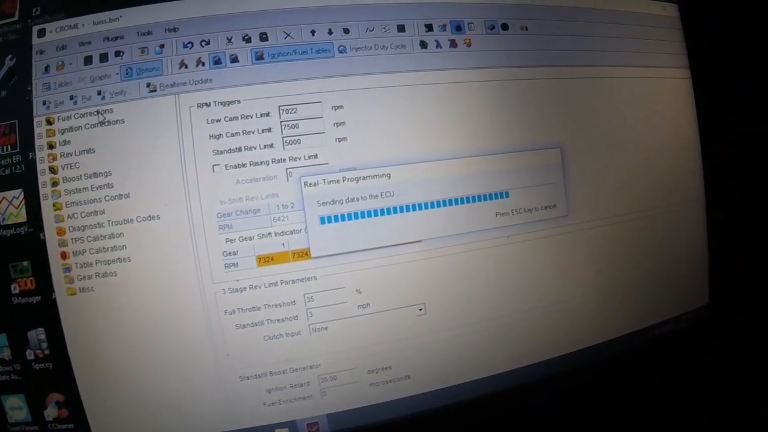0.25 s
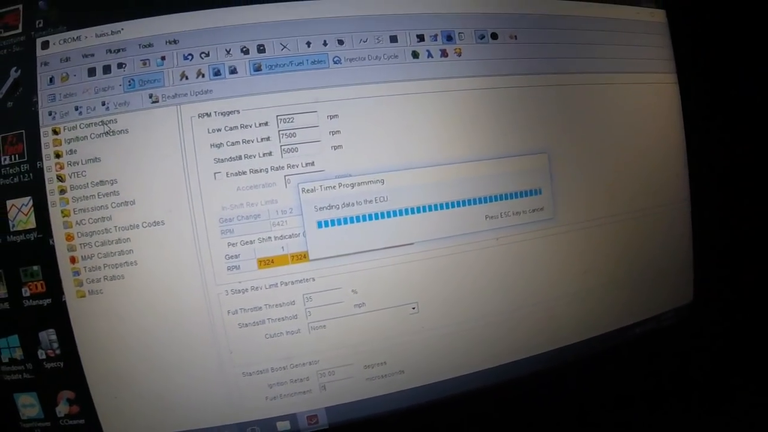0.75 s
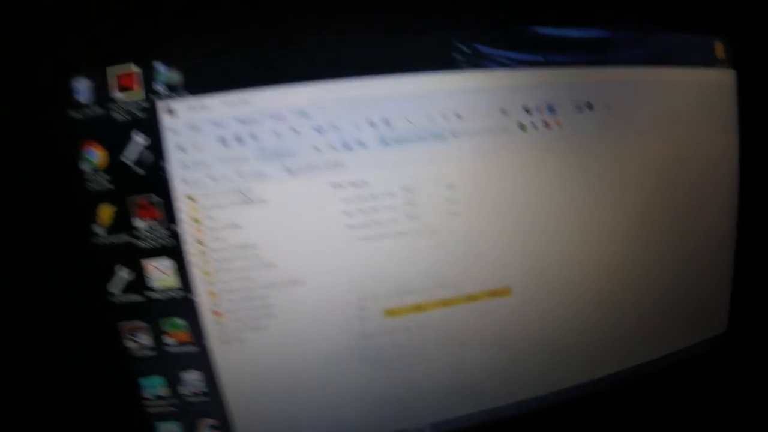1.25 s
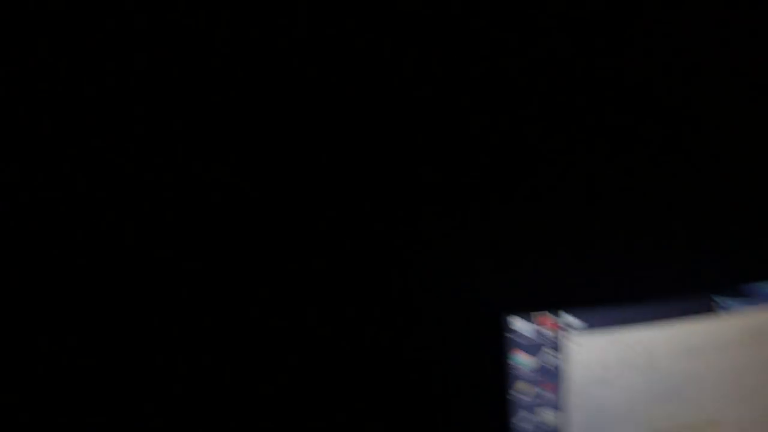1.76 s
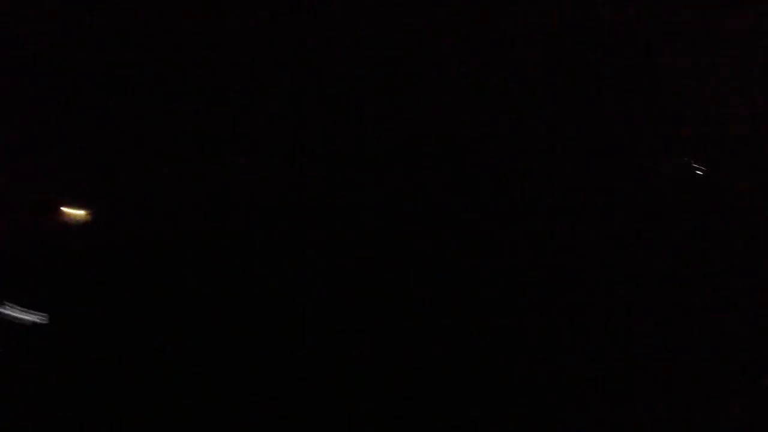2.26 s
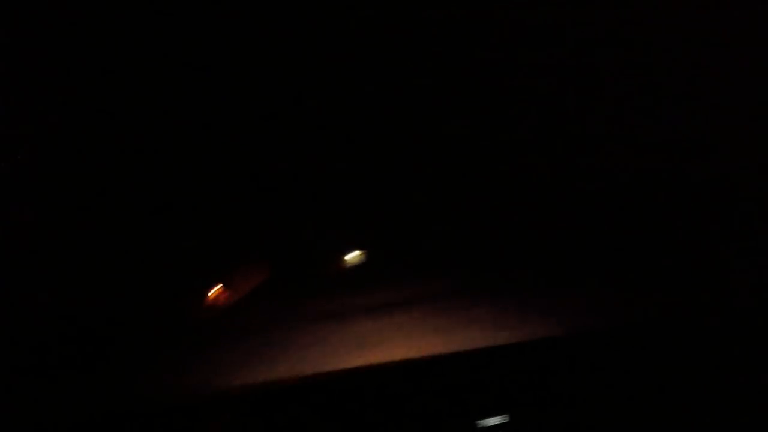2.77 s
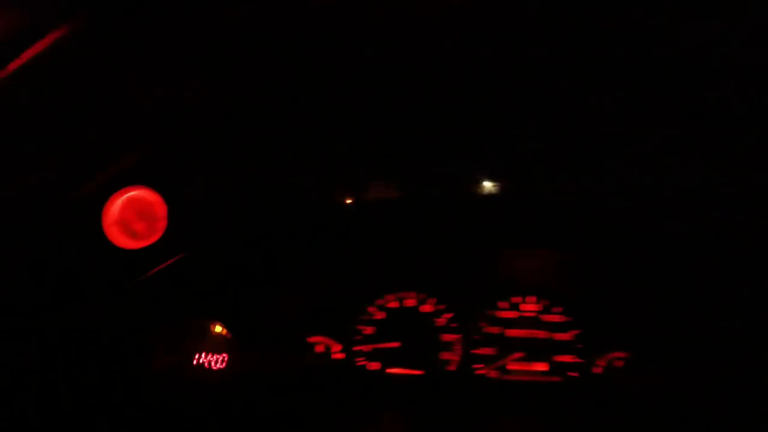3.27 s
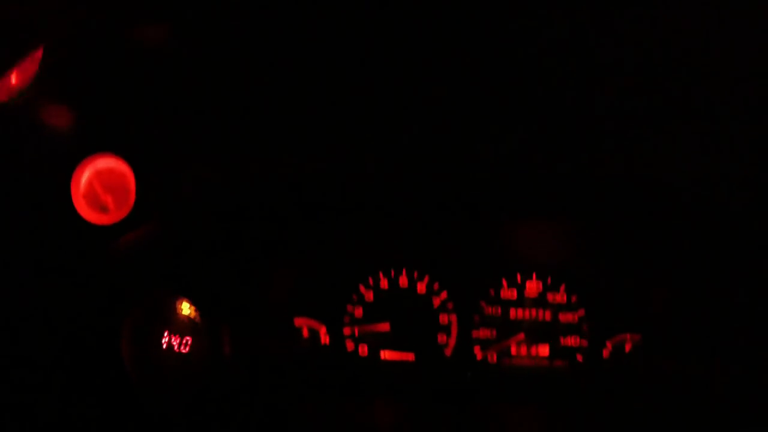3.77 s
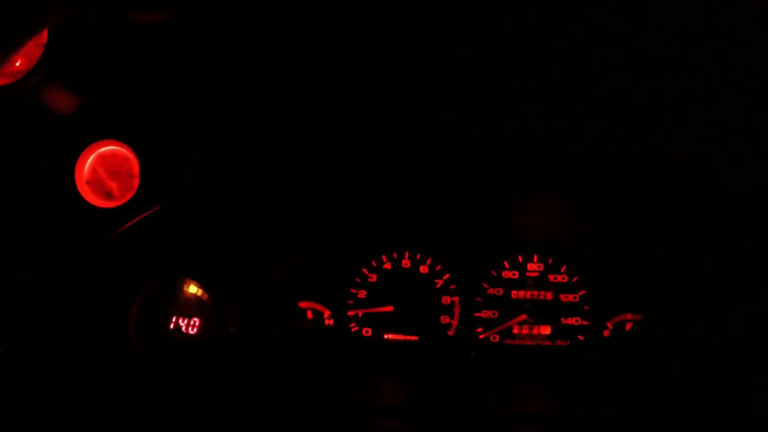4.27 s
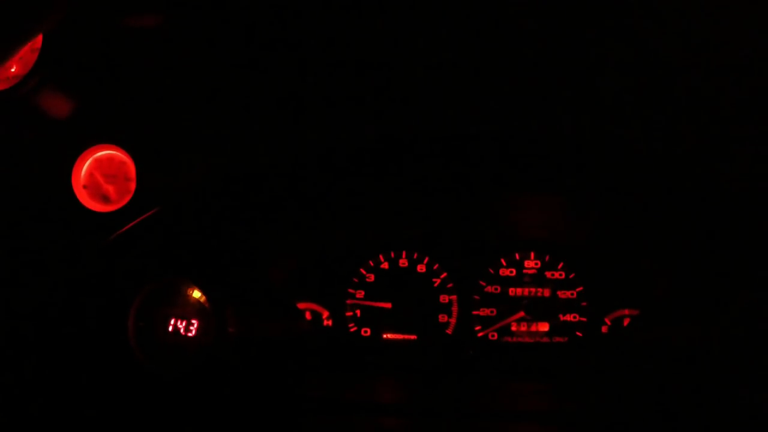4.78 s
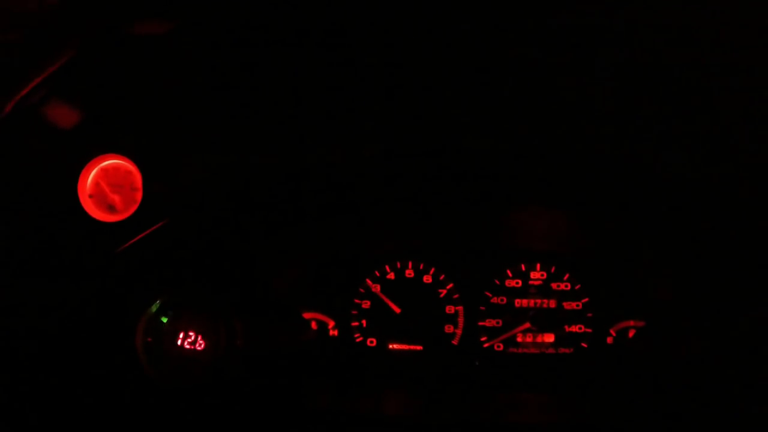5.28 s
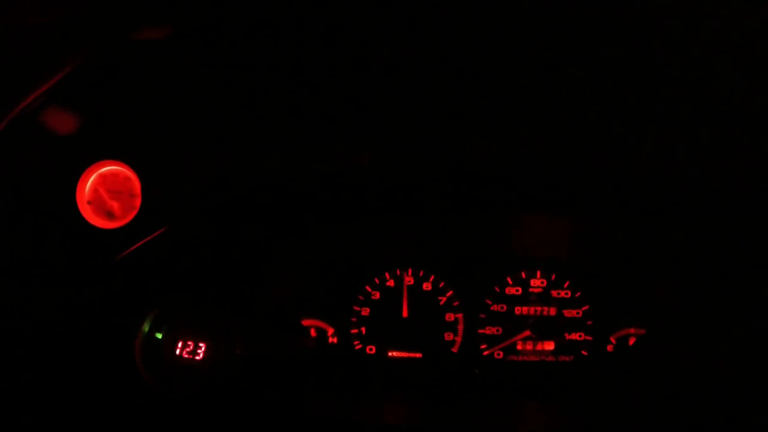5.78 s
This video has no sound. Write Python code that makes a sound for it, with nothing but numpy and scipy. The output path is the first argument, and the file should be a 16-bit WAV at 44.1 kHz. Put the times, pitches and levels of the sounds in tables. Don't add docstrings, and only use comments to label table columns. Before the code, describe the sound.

Heard inside a parked car, close and dry with a boomy cabin. From 0 s a four-cylinder engine idles steadily, a low hum of about 35 firings per second with cabin boom around 140-200 Hz, soft pipe roar and light valve clatter. From 1.5 s the microphone swings toward the driver's side; cloth brushes faintly, the boom dips and a dashboard hum stands out near 2 s. A plastic creak with hollow knocks comes at 2.15-2.2 s, a softer knock at 2.4 s and another at 4.0 s. Small clicks precede the throttle at 4.46 s: a deep thump and stumble around 4.5-4.6 s, then revs leap, hold briefly near 5.2 s and pull again from 5.35 s, loud and bassy with a very faint thin whistle. At 5.75 s the limiter chops the roar into uneven bursts and dull, raspy pops until it cuts off just after 6 s.

```python
import sys
import numpy as np
from scipy import signal
from scipy.fft import rfft, irfft
from scipy.io import wavfile
from scipy.ndimage import uniform_filter1d, minimum_filter1d

SR = 44100
rng = np.random.default_rng(int(sys.argv[2]) if len(sys.argv) > 2 else 0)


def digitize_waveform(pressure):
    field = np.atleast_2d(pressure).T
    bounded = np.clip(field, -1, 1)
    quanta = np.round(bounded * 32767).astype(np.int16)
    wavfile.write(sys.argv[1], SR, quanta)


def amplitude_ratio(level_db):
    exponent = np.asarray(level_db, float) / 20
    return 10 ** exponent


N = 266115

# start in seconds, end in seconds, level in dB against full load.
FIRING_BURSTS = [
    (5.8, 5.872, -4),
    (5.957, 5.98, -8),
    (5.98, 6.2, -6),
]
# time in seconds, peak in dB, pitch in Hz, push +1 or pull -1, rasp from 0 to 1.
PIPE_POPS = [(4.52, -7.5, 95, -1, 0.03), (4.55, 0, 105, -1, 0.03), (4.575, -4, 124, -1, 0.05),
             (4.599, -10, 131, -1, 0.1), (5.301, -10, 140, 1, 0), (5.754, -14, 72.2, 1, 0.3),
             (5.78, -1, 177, -1, 0.35), (5.793, -11.5, 101.3, 1, 0.8), (5.805, -20.5, 114, -1, 0.6),
             (5.876, -16.5, 61.1, 1, 0.4), (5.899, -3.5, 176, -1, 0.34), (5.910, -10, 85, 1, 0.8),
             (5.927, -4, 112, 1, 0.3), (5.935, -13, 110, 1, 0), (5.986, -1, 95.8, -1, 0.2),
             (5.997, -10, 115, 1, 0.6), (6.006, -4.5, 85.7, -1, 0.3)]
# pitch in Hz, width in Hz, level in dB.
CABIN_MODES = [(138, 24, -2), (179.5, 14.4, 2.5), (205.4, 20.6, -8.5)]
# frequency in Hz, level in dB.
PIPE_SPECTRUM = [(250, -10.5), (310, -8.5), (380, -6), (450, -18), (520, -13.5), (650, -17), (800, -17.5),
                 (1100, -26.5), (3200, -64.5)]
# frequency in Hz, level in dB per Hz.
RUMBLE_SPECTRUM = [(12, -13.5), (25, -6), (50, -1), (100, -0.5), (170, 5), (230, -6), (280, -21.5),
                   (450, -24.5)]
# frequency in Hz, level in dB per Hz.
ROAR_SPECTRUM = [(150, -29.5), (260, 7), (269, -3), (447, -9), (534, -7.5), (561, -7), (1160, -11),
                 (1800, -25.5), (2340, -38), (3960, -120)]
# frequency in Hz, level in dB per Hz.
CLATTER_SPECTRUM = [(880, -27.5), (1500, -3), (1620, -6), (2150, -4.5), (2450, -8), (3890, -15),
                    (5240, -15.5), (5910, -20), (6600, -18), (7520, -22.5), (10200, -34.5), (12500, -38.5),
                    (13700, -42)]
# pitch in Hz, width in Hz, level in dB.
VALVE_COVER = (6500, 71, -16)
# time in seconds, pitch in Hz, level in dB.
TURBO_WHISTLE = [(5.47, 3080, -73), (5.57, 3550, -71.5), (5.61, 3700, -62), (5.74, 3840, -61),
                 (5.8, 3820, -61), (5.87, 3880, -62), (6.04, 3780, -59)]
# pitch in Hz, width in Hz, level in dB.
TRIM_MODES = [(284.7, 9, 4.5), (484, 25, 2.5), (676, 40, 1), (1007, 26, -2.5), (1324, 71, -12),
              (1810, 63, -16.5), (2035, 69, -17.5), (3210, 450, -24), (4580, 230, -27.5),
              (6740, 230, -25.5)]
# time in seconds, peak in dB, extra level of the low hollow mode in dB.
TRIM_KNOCKS = [(2.156, -16, 9), (2.203, -14.5, 2), (2.367, -22, -2), (4.03, -19, -12), (4.52, -32.5, -11),
               (5.444, -24, -12.5), (5.777, -17, -12), (5.905, -23.5, -10)]
# time in seconds, peak in dB, pitch in Hz.
TRIM_CLICKS = [(2.123, -40.5, 3000), (2.4, -43, 6600), (4.449, -35, 4000), (4.490, -39.5, 3960),
               (4.617, -46.5, 5000), (5.609, -31, 2484)]
# pitch in Hz, width in Hz, level in dB.
BUZZING_PANELS = [(517, 16, -3.5), (660, 120, -9), (956, 56, -15), (1179, 64, -7), (1308, 23, -11.5),
                  (1630, 18, -13.5), (2190, 140, -15.5)]
# time in seconds, extra path in firing cycles.
EXTRA_PATH = [(1.6, .065), (2.7, 0)]
# multiple of the firing rate, level in dB.
UPPER_ORDER_LEVELS = [(2.5, -0.5), (3.5, 3.5), (4, 5), (4.5, -8), (5, 4.5), (6, -8.5), (7, 1.5), (8, -3.5),
                      (9, 0), (10, -6.5), (11, -6.5), (12, -1), (14, -2), (15, -2.5), (18, 3.5)]
# multiple of the firing rate, level in dB when slow,
# level in dB when fast.
UNEVEN_CYLINDERS = [(.25, -32.5, -31), (.5, -30, -35.5), (.75, -27, -20), (1.5, -19, -26),
                    (1.75, -32, -29.5)]
# time in seconds, level in dB, decay in seconds.
SUDDEN_STEP = (4.4582, -11, .003)
# time in seconds, firings per second.
ENGINE_SPEED = [(0.0, 34.39), (0.55, 34.86), (1.6, 34.69), (2.05, 34.31), (2.6, 35.11), (3.4, 35.11),
                (3.9, 34.71), (4.55, 35.34), (4.79, 61.69), (4.94, 71.91), (5.1, 96.29), (5.16, 100.51),
                (5.32, 102.15), (5.45, 123.91), (5.52, 143.35), (5.6, 160.05), (5.76, 167.04)]
# time in seconds, share of the way.
MIC_SWING = [(1.5, 0.027), (1.9, 0.39), (2.0, 0.44), (2.27, 0.6), (2.45, .66), (3.0, 0.72), (3.8, 1)]
# time in seconds, level in dB.
ENGINE_EFFORT = [(4.46, 3), (4.5, -13), (4.595, -10), (4.64, -4), (5.05, -2.5), (5.32, -1.5), (5.46, 5.5),
                 (5.54, -1), (5.62, 1)]
# idle level on the passenger side in dB, idle level on the driver's side in dB,
# loaded level at 100 firings per second in dB, slope in dB per octave of speed, share of the effort.
LOW_ORDER_LAWS = [
    (-19.5, -18.5, 1.3, -2.2, 1),
    (-24, -22.5, -2.5, 1.5, 0.48),
    (-30.5, -22.5, -9.5, -2, 0.72),
]
BOOM_LAW = (-21, -22, -36, 2.3, 4)
UPPER_LAW = (-43, -51, -40.5, 9.5, 0.05)
ROAR_LAW = (-46, -42.5, -45.5, 7.5, 0.07)
VALVE_LAW = (-53.5, -53, -55.5, 5.5, 0.3)
DASH_LAW = (-40.5, -45.5, -71, -1, -0.5)
TOP_LAW = (2.6, 0.5, -14, 3, -1.8)
LOW_MODE_LAW = (-4.5, 1.4, 2.5, -0.3, .1)
# pitch in Hz, width in Hz, level in dB.
FLOOR_PAN = [(52.6, 24, -17.5), (77, 15, -18.5), (99.7, 21, -19.5), (127, 25, -16), (167.5, 25.5, -10.5),
             (221, 20, -21), (256, 13, -28.5), (340.5, 29, -29), (383.5, 33, -21.5), (500, 49, -25.5)]
# peak time in seconds, level in dB.
TRIM_RUBS = [(2.16, -27.5), (2.194, -27), (2.207, -23)]
# middle in seconds, length in seconds, level in dB, pitch in Hz.
BRUSHES = [(1.68, .5, -54, 1700), (2.66, .05, -56.5, 4460), (2.78, .02, -56.5, 5400),
           (4.65, .055, -44, 270), (5.89, .13, -33, 370), (4.57, 0.078, -50.5, 930),
           (4.58, .06, -59.5, 3210)]

NODE_AT, NODE_WIDTH = 0.506, 0.14
NODE_BOOM_DB, NODE_HUM_DB = -14.5, 6
THROTTLE_S, LIMITER_S, OPENING_S = 4.46, 5.755, 0.02
RUMBLE_DB, LIMITER_RUMBLE_DB = -31.5, -23.5
LIMITER_ROAR_DB = 1
RUB_RISE_DB_S, RUB_FALL_DB_S = 1500, 701


def rms_one(x):
    return x / np.sqrt(np.mean(x ** 2) + 1e-20)


def in_time(rows):
    s, *columns = np.transpose(rows)
    return [np.interp(np.arange(N) / SR, s, c) for c in columns]


def at_hz(points, hz):
    point_hz, point_db = np.transpose(points)
    return np.interp(np.log(hz), np.log(point_hz), point_db)


def drift(rate):
    r = np.exp(-80 * np.pi * rate / SR)
    noise = rng.standard_normal(N // 40 + 2002)
    slow = signal.lfilter([1], [1, -2 * r, r * r], noise)[2000:]
    return np.interp(np.arange(N) / 40, np.arange(len(slow)), rms_one(slow))


def resonate(x, hz, width_hz):
    r = np.exp(-np.pi * width_hz / SR)
    poles = [1, -2 * r * np.cos(2 * np.pi * hz / SR), r * r]
    return signal.lfilter(np.array([1, 0, -1]) * (1 - r * r) / 2, poles, x + 1e-18)


def body(x, modes):
    return sum((-1) ** k * amplitude_ratio(db) * resonate(x, hz, width) for k, (hz, width, db) in enumerate(modes))


def coloured(spectrum, patchy_db):
    hz = np.maximum(np.fft.rfftfreq(N, 1 / SR), 1)
    shaped = rfft(rng.standard_normal(N)) * amplitude_ratio(at_hz(spectrum, hz))
    out = 0
    for centre in np.arange(np.log2(spectrum[0][0]), np.log2(spectrum[-1][0]) + 0.5, 0.5):
        share = np.clip(1 - 2 * abs(np.log2(hz) - centre), 0, 1)
        out = out + irfft(shaped * share, N) * amplitude_ratio(patchy_db * drift(14))
    return rms_one(out)


def struck(events):
    clicks = np.zeros(N)
    clicks[[round(e[0] * SR) for e in events]] = amplitude_ratio([e[1] for e in events])
    return clicks


def layer_db(law, rate_hz, response_db=0):
    near_db, far_db, loaded_db, octave_db, share = law
    swing, effort_db = np.clip(in_time(MIC_SWING)[0], 0, 1), in_time(ENGINE_EFFORT)[0]
    opened = np.clip((np.arange(N) / SR - THROTTLE_S) / OPENING_S + 0.5, 0, 1)
    idle = near_db + (far_db - near_db) * swing
    loaded = loaded_db + octave_db * np.log2(rate_hz / 100) + share * effort_db + response_db
    return idle + opened * (loaded - idle)


def node(db):
    return db * np.exp(-((in_time(MIC_SWING)[0] - NODE_AT) / NODE_WIDTH) ** 2)


def rustles():
    t = np.arange(N) / SR
    grains = rng.standard_normal(N) * amplitude_ratio(2.2 * drift(60))
    out = np.zeros(N)
    for s, length, db, hz in BRUSHES:
        band = resonate(resonate(grains, hz, 0.9 * hz), hz, 0.9 * hz)
        out += amplitude_ratio(db) * np.exp(-((t - s) / length) ** 2) * rms_one(band)
    return out


def trim():
    t = np.arange(N) / SR
    slopes = [db - np.maximum(RUB_RISE_DB_S * (s - t), RUB_FALL_DB_S * (t - s)) for s, db in TRIM_RUBS]
    level_db = np.max(slopes, axis=0)
    slips = (rng.random(N) < 1500 / SR) * rng.standard_normal(N)
    out = body(amplitude_ratio(level_db + 36) * slips, TRIM_MODES)
    out += amplitude_ratio(32) * body(struck(TRIM_KNOCKS), TRIM_MODES[1:7])
    hollow = [(s, db + low_db) for s, db, low_db in TRIM_KNOCKS]
    out += amplitude_ratio(34) * body(struck(hollow), TRIM_MODES[:1])
    for s, db, hz in TRIM_CLICKS:
        out += amplitude_ratio(15) * resonate(struck([(s, db)]), hz, 4600)
    step_decay = np.exp(-1 / (SUDDEN_STEP[2] * SR))
    out -= signal.lfilter([1], [1, -step_decay], struck([SUDDEN_STEP]))
    return signal.sosfilt(signal.butter(3, 8500, fs=SR, output="sos"), out)


def turbo():
    hz, db = in_time(TURBO_WHISTLE)
    turns = np.cumsum(hz * (1 + 0.0012 * drift(10))) / SR
    spooled = hz > TURBO_WHISTLE[0][1]
    return spooled * amplitude_ratio(db + 1.2 * drift(12)) * np.sin(2 * np.pi * turns)


def puff(turns, depth, lag):
    push = np.exp(1.53 * np.cos(2 * np.pi * (turns - lag)) - 2.5)
    return rms_one(1 + depth * push * amplitude_ratio(3.3 * drift(15)))


def valve_clatter(turns, top_db):
    clatter = coloured(CLATTER_SPECTRUM, patchy_db=1.0)
    top = signal.sosfiltfilt(signal.butter(3, 8500, "high", fs=SR, output="sos"), clatter)
    clatter = clatter - top * (1 - amplitude_ratio(top_db))
    hz, width, db = VALVE_COVER
    clatter = clatter + amplitude_ratio(db) * rms_one(resonate(rng.standard_normal(N), hz, width))
    return clatter * puff(turns, 1.1, 0.3)


def body_roar(turns):
    buzz = np.zeros(N)
    for hz, width, db in BUZZING_PANELS:
        buzz += amplitude_ratio(db + 1.8 * drift(0.44)) * rms_one(resonate(rng.standard_normal(N), hz, width))
    return coloured(ROAR_SPECTRUM, patchy_db=0.0) * puff(turns, 0.94, 0.23) + amplitude_ratio(-7.5) * buzz


def machinery(turns, rate_hz):
    rumble_db, = in_time([(LIMITER_S - OPENING_S, RUMBLE_DB), (LIMITER_S + OPENING_S, LIMITER_RUMBLE_DB)])
    limiting = np.arange(N) / SR > LIMITER_S
    roar_db = layer_db(ROAR_LAW, rate_hz) + LIMITER_ROAR_DB * limiting
    rumble = amplitude_ratio(rumble_db) * coloured(RUMBLE_SPECTRUM, patchy_db=1.5)
    clatter = valve_clatter(turns, layer_db(TOP_LAW, rate_hz))
    return rumble + amplitude_ratio(roar_db) * body_roar(turns) + amplitude_ratio(layer_db(VALVE_LAW, rate_hz)) * clatter


def pops():
    out, t = np.zeros(N), np.arange(-300, 2400) / SR
    for s, db, hz, sign, rasp in PIPE_POPS:
        i = round(s * SR) - 300
        shape = np.where(t < 0, np.exp(-(t * hz / 0.26) ** 2), np.exp(-t * hz / 0.59))
        swing = uniform_filter1d(shape * np.cos(2 * np.pi * hz * t), size=100)
        burst = rng.standard_normal(len(t)) * np.exp(-abs(t) / 0.0054)
        edge = resonate(resonate(burst, 500, 450), 390, 500)
        out[i:i + len(t)] += (amplitude_ratio(db) * (sign * swing + rasp * edge))[:N - i]
    return out


def ignition():
    t = np.arange(N) / SR
    gate = (t < 5.75) + sum(amplitude_ratio(db) * ((t >= a) & (t < b)) for a, b, db in FIRING_BURSTS)
    return uniform_filter1d(gate + 0.11, size=260)


def pan_db(hz):
    return 20 * np.log10(sum(amplitude_ratio(db) / (1 + (2 * (hz - mode) / width) ** 2) for mode, width, db in FLOOR_PAN))


def cabin_boom(late, rate_hz):
    fired = np.flatnonzero(np.diff(np.floor(late + 0.02)))
    cylinder_db = np.resize([0.3, -0.64, 1.0, -2.3], len(fired))
    strength = amplitude_ratio(cylinder_db + 1.3 * rng.standard_normal(len(fired)))
    pulses = np.zeros(N)
    pulses[fired] = -strength * np.sqrt(35 / rate_hz[fired])
    low_cut = 1 - amplitude_ratio(layer_db(LOW_MODE_LAW, rate_hz))
    ring = body(pulses, CABIN_MODES) - low_cut * body(pulses, CABIN_MODES[:1])
    boom = signal.sosfilt(signal.butter(3, [118, 262], "band", fs=SR, output="sos"), ring)
    return amplitude_ratio(layer_db(BOOM_LAW, rate_hz) + node(NODE_BOOM_DB)) * rms_one(boom)


def exhaust(turns, rate_hz):
    late = turns - in_time(EXTRA_PATH)[0]
    order_db = [layer_db(law, rate_hz, pan_db((k + 1) * rate_hz)) for k, law in enumerate(LOW_ORDER_LAWS)]
    angles = 2 * np.pi * turns, 4 * np.pi * turns - 0.3, 6 * np.pi * late - np.pi
    tones = sum(amplitude_ratio(db + 0.95 * drift(35)) * np.sin(angle) for db, angle in zip(order_db, angles))
    upper_db = layer_db(UPPER_LAW, rate_hz)
    for k, db in UPPER_ORDER_LEVELS:
        above_boom = np.clip((k * rate_hz - 250) / 20, 0, 1)
        level_db = upper_db + db + at_hz(PIPE_SPECTRUM, k * rate_hz) + 2.0 * drift(1.4)
        tones += above_boom * amplitude_ratio(level_db) * np.sin(2 * np.pi * k * turns + k * k)
    hum_db = layer_db(DASH_LAW, rate_hz) + node(NODE_HUM_DB) + 1.2 * drift(1.8)
    tones += amplitude_ratio(hum_db) * np.sin(14 * np.pi * late)
    load = np.clip((rate_hz - 60) / 40, 0, 1)
    for k, slow_db, fast_db in UNEVEN_CYLINDERS:
        db = np.interp(rate_hz, [110, 150], [slow_db, fast_db])
        tones += load * amplitude_ratio(order_db[0] + db + 1.9 * drift(3.9)) * np.sin(2 * np.pi * k * turns)
    return np.sqrt(2) * tones + cabin_boom(late, rate_hz)


def scene():
    rate_hz, = in_time(ENGINE_SPEED)
    turns = np.cumsum(rate_hz) / SR + 0.26
    engine = ignition() * exhaust(turns, rate_hz) + pops() + machinery(turns, rate_hz)
    return (rustles() + trim() + turbo() + engine)[None]


def low_pass(x):
    return signal.sosfilt(signal.butter(12, 13880, fs=SR, output="sos"), x)


def record(dry):
    room = np.minimum(1, 0.55 / (abs(dry) + 1e-9))
    gain = uniform_filter1d(minimum_filter1d(room, size=801), size=801)
    fade = np.clip(np.minimum(np.arange(N), N - np.arange(N)) / 90, 0, 1)
    return low_pass(dry * gain * fade)


dry = scene()
out = record(dry)
digitize_waveform(out)
```